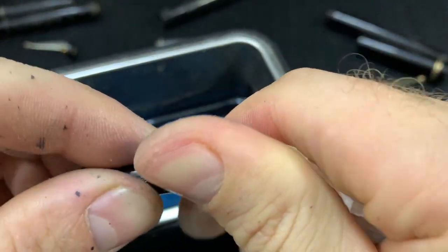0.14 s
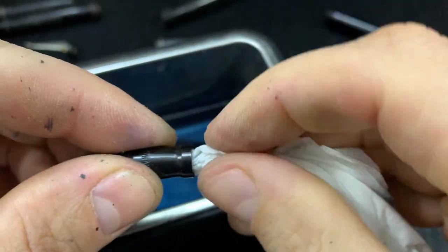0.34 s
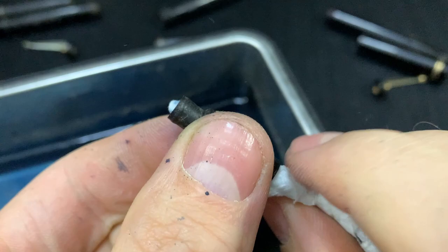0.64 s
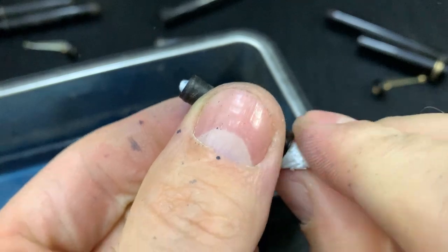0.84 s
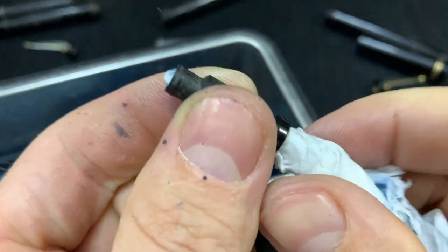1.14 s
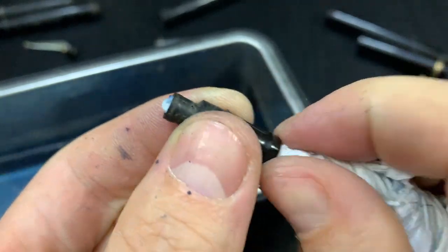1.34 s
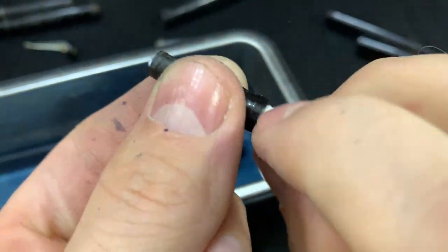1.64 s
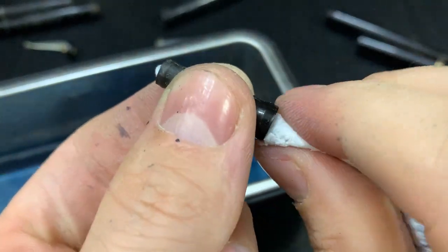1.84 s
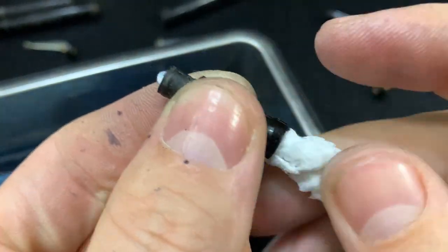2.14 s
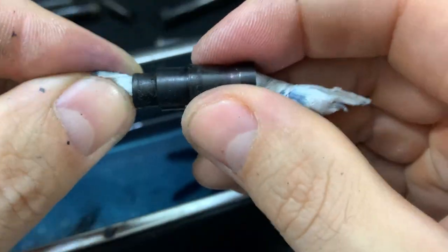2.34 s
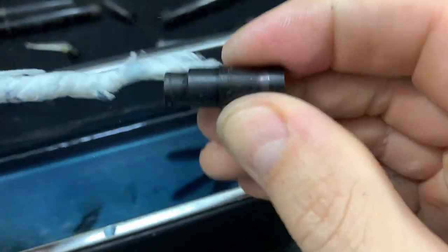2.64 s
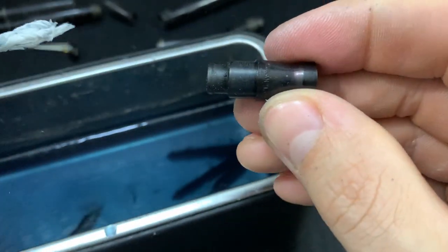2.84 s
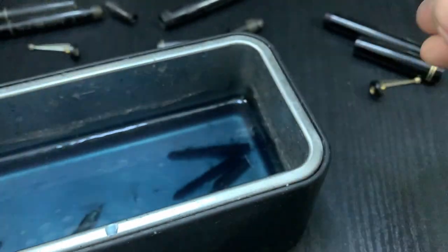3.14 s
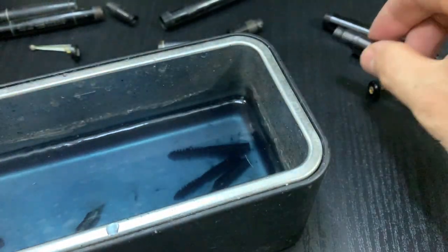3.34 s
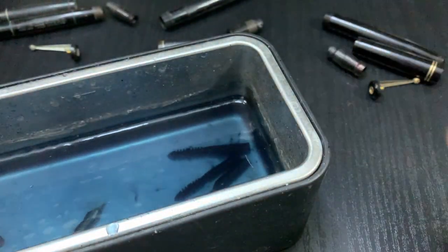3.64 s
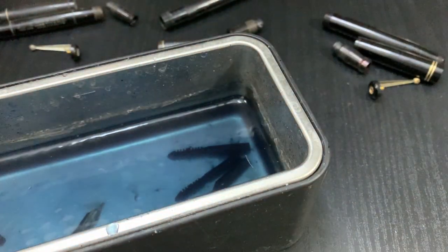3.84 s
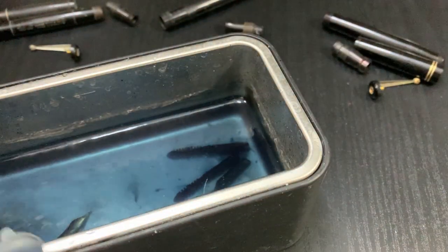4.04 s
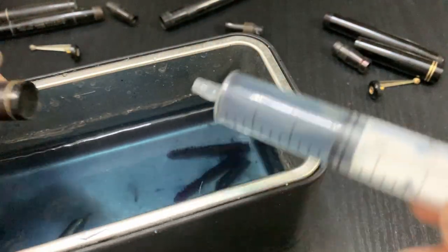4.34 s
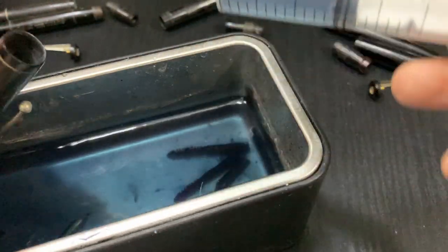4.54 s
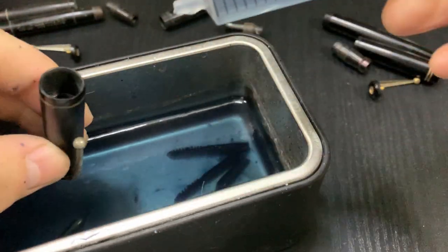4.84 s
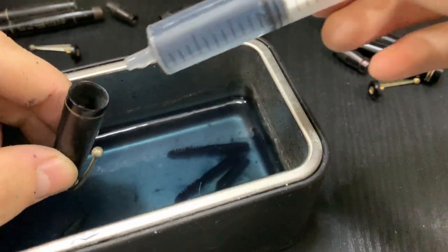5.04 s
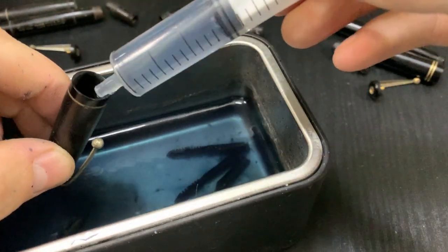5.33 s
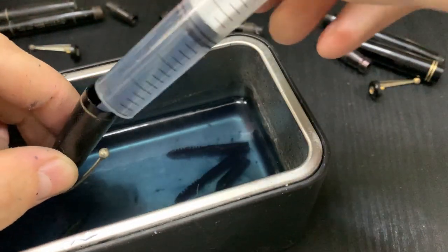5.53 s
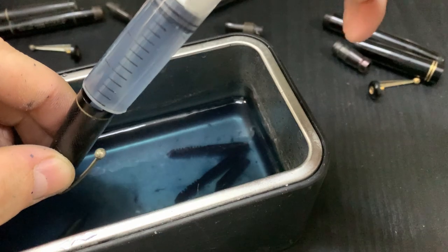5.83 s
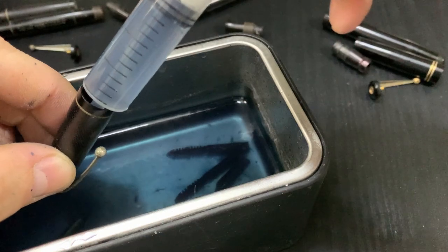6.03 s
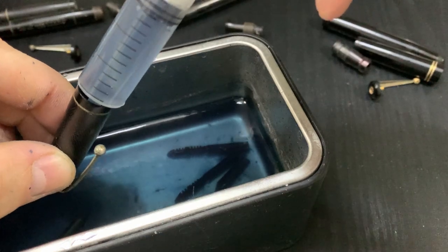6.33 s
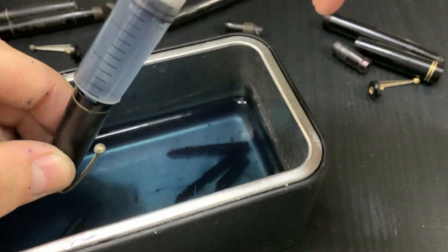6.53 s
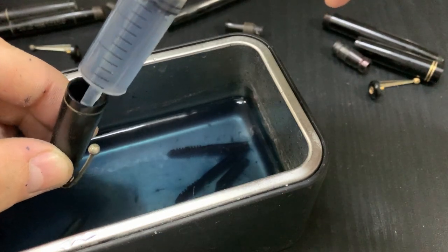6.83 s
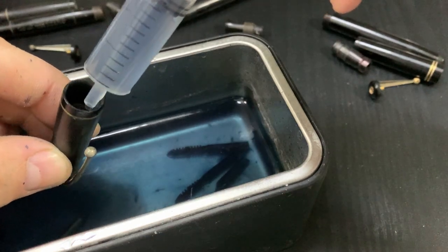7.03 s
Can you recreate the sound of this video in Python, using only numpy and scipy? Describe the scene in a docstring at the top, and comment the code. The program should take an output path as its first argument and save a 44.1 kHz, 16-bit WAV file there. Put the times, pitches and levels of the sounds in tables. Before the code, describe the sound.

Close indoor stereo sound of a small vibrating cleaning bath: a fast-pulsing, sandy treble buzz with thin whines, hiss and low hum. It starts fairly even, gains a sharper high ring after two seconds, and drops to a slower, rougher pulse around four seconds. A part lightly scuffs and taps the desk just before, and quick tool knocks land just after that change. Low desk thumps recur irregularly.

```python
"""A small cleaning tank buzzes on a desk close to a two-port microphone, in four abutting stretches.
Its drive hums in steady partials and shakes tank and soaking parts into bursts of rattle that nearly
repeat: noise through a comb, coloured by wall resonances, over whines, hiss and a low wash.
The desk passes low throbs (partials and rumble); a part is laid down and a tool knocks on the desk
(scuffs of noise, decaying modes). Hands over the tank make bright bands drift."""
import sys
import numpy as np
from scipy import signal
from scipy.fft import rfft, irfft, next_fast_len
from scipy.io import wavfile
from scipy.ndimage import uniform_filter1d, map_coordinates

SR = 44100
rng = np.random.default_rng(int(sys.argv[2]) if len(sys.argv) > 2 else 0)


def int16_out(signal):
    """Quantize to a 16-bit WAV file."""
    q = np.round(np.clip(np.atleast_2d(signal).T, -1, 1) * 32767)
    wavfile.write(sys.argv[1], SR, q.astype(np.int16))


N = 316638


def gain_of(db):
    """Amplitude factor of a level in dB."""
    return 10 ** (np.asarray(db) / 20)


def evened(x):
    """Scales to rms 1."""
    return x / np.sqrt(np.mean(x ** 2) + 1e-20)


def read(points, hz):
    """Reads a curve along log frequency."""
    point_hz, value = np.transpose(points)
    return np.interp(np.log(hz + 1), np.log(point_hz + 1), value)


def drift(n, rate_hz, count):
    """Slow chance: straight lines between random knots of rms 1, one row each."""
    knots = rng.standard_normal((count, 200))
    place = np.broadcast_arrays(np.arange(count)[:, None], np.arange(n) * rate_hz / SR)
    return map_coordinates(knots, place, order=1)


# Phase between the ports, one table a stretch. Each row: frequency in Hz, radians by which left leads.
LEAD_A = [(0, 0), (600, 4.5), (860, 7.5), (1460, 10.5), (3620, 26), (7490, 32.5), (8870, 24.5), (9220, 25),
          (9650, 28.5), (11100, 10.5), (12100, 20), (12600, 17), (13000, 18.5), (15700, 15)]
LEAD_B = [(0, -2.5), (600, -2.2), (860, -2), (2840, -1.1), (5600, -2), (7750, -12), (8870, -11), (9130, -4),
          (9990, -19), (10400, -21.5), (10700, -15.5), (11700, -21.5), (12100, -22), (15700, -13.5)]
LEAD_C = [(0, -8), (340, 1.07), (1030, 0.98), (1290, 1.45), (2240, 4.5), (2500, 3.5), (3270, -4),
          (3620, -4), (4390, -5), (5770, -7), (7320, -10), (8440, -11), (12200, -17), (15700, -20)]
LEADS = [LEAD_A, LEAD_A, LEAD_B, LEAD_C]
# Balance of the ports. Each row: frequency in Hz, left over right in dB.
BALANCE_DB = [(60, 2.5), (110, -2), (200, 2.5), (380, -1.5), (700, 5), (1290, -1.5), (2380, 0.5),
              (4400, -6), (8120, 0.5), (15000, 0.0)]
# Likeness of the ports. Each row: frequency in Hz, likeness 0-1.
PORT_LIKENESS = [(60, .5), (250, .6), (500, .7), (2000, .5), (4000, .55), (7000, .6), (10500, .85),
                 (11500, .7), (13000, .5)]


def lead_rad(k, hz):
    """Radians by which left leads in stretch k."""
    return np.interp(hz, *np.transpose(LEADS[k]))


def ports(pair, colour, k):
    """Colours two unrelated signals and mixes them into a partly alike left and right, rms 1."""
    n = pair.shape[1]
    size = next_fast_len(n)
    hz = np.fft.rfftfreq(size, 1 / SR)
    a, b = rfft(pair, size) * colour(hz)
    same = np.clip(read(PORT_LIKENESS, hz), 0, 1)
    tilt = gain_of(read(BALANCE_DB, hz) / 2)
    right = (same * a + np.sqrt(1 - same ** 2) * b) * np.exp(-1j * lead_rad(k, hz))
    return evened(irfft(np.array([a * tilt, right / tilt]), size)[:, :n])


def partials(turns, multiple, level_db, pan_db, start_turns, lag_rad):
    """Multiples of the drive at an rms level over both ports, each placed by balance and lag."""
    phase = (2 * np.pi * ((multiple * turns + start_turns) % 1)).astype(np.float32)
    level = gain_of(level_db.astype(np.float32)) * np.sqrt(2 / np.cosh(pan_db * np.log(10) / 20))
    left = level * gain_of(pan_db / 2) * np.cos(phase)
    right = level / gain_of(pan_db / 2) * np.cos(phase - lag_rad.astype(np.float32))
    return np.array([left.sum(0), right.sum(0)])


def echoing_noise(n, period_hz, likeness):
    """Noise that partly repeats every period, less so at the very top: a feedback comb."""
    size = next_fast_len(n)
    hz = np.fft.rfftfreq(size, 1 / SR)
    kept = likeness * np.interp(hz, [10600, 11600], [1, .75])
    comb = np.sqrt(1 - kept ** 2) / (1 - kept * np.exp(-2j * np.pi * hz / period_hz))
    return evened(irfft(rfft(rng.standard_normal((2, size))) * comb, size)[:, :n])


def burst_db(phase, start, rise, hold, fall, depth_db):
    """Rise, hold and fall of one burst, in dB over its quiet part."""
    u = (phase - start) % 1
    return depth_db * np.clip(np.minimum(u / rise, 1 - (u - rise - hold) / fall), 0, 1)


# Burst shapes for treble, ring and middle. Each row: start, rise, hold, fall in shares of the burst
# period, depth in dB.
BURST_A = [(.02, 0.32, 0.12, .36, 15.5), (.1, 0.35, .15, .3, 6), (.92, .36, 0.23, .42, 2)]
BURST_B = [(.03, 0.34, 0.29, 0.58, 24), (.03, 0.25, 0.14, 0.36, 17), (.05, .36, .1, .33, 6)]
BURST_C = [(0.18, 0.062, 0.2, 0.71, 29), (0.11, .16, 0.37, 0.72, 24.4), (0.19, 0.12, 0.22, 0.35, 8.64)]
BURSTS = [BURST_A, BURST_A, BURST_B, BURST_C]
# Sharp treble crack in each burst. Each entry: lift in dB, by stretch.
CRACK_DB = [3, -7, 1, 19]
CRACK_AT, CRACK_WIDTH = 0.557, 0.038  # shares of the burst period
# Weight of the burst-to-burst chance. Each entry: factor for treble, ring, middle.
SPREAD_SHARE = [0.82, 0.53, 0.99]


def burst_levels(k, bursts, spread_db):
    """Level of treble, ring and middle over the bursts, each rms 1, with one chance draw a burst."""
    number = (bursts - np.floor(bursts[0])).astype(int)
    chance = rng.standard_normal((3, 400))[:, number]
    shapes_db = [burst_db(bursts, *row) for row in BURSTS[k]]
    shapes_db[0] = shapes_db[0] + CRACK_DB[k] * np.exp(-((bursts % 1 - CRACK_AT) / CRACK_WIDTH) ** 2)
    levels = []
    for j, shape_db in enumerate(shapes_db):
        mixed = 0.42 * chance[0] + 0.62 * chance[1 + j % 2]  # common chance, plus a second draw shared by treble and middle, the ring having its own
        levels.append(evened(gain_of(shape_db + SPREAD_SHARE[j] * spread_db * mixed)))
    return levels


# Rattle colour, one table a stretch. Each row: frequency in Hz, density in dB per Hz before tank lift.
RATTLE_A = [(1180, -62), (2000, -8), (2340, -10.5), (2660, -31.5), (3360, -23.5), (4790, -19), (5650, -8),
            (6320, -14.5), (8260, -4.5), (8620, -2), (9900, 0.5), (12100, -4), (15800, -5)]
RATTLE_B = [(1180, -65), (2000, -17.5), (2500, -25.5), (2950, -22.5), (3990, -24), (4320, -19.5),
            (4960, -23), (7770, -11), (8400, -15), (9730, -6), (10800, 0), (12800, -4.5), (15800, -6)]
RATTLE_C = [(1180, -29.5), (2000, -19), (2460, -21.5), (2950, -16.5), (3990, -20.5), (4360, -21.5),
            (7190, -10), (7710, -7), (10600, 0.5), (11300, 6.5), (11900, 1), (14100, -1), (15800, -4.5)]
RATTLES = [RATTLE_A, RATTLE_A, RATTLE_B, RATTLE_C]
# Tank wall resonances. Each row: centre in Hz, width in Hz, lift in dB in the first two stretches,
# in the third, in the fourth.
TANK = [(2930, 500, 20.5, 5.5, 3), (3360, 340, 11.5, 7.8, 4.8), (4340, 370, 11.5, 6.7, 9.6),
        (5950, 150, 4, 4.1, 0.39), (7826, 216, 7.5, 5.3, 8.7), (8770, 650, 5.5, 11.4, 5.2),
        (9660, 240, 10, 1, 0.56), (10360, 680, 6.5, 8.4, 10.8), (10660, 310, 2.5, 1, 1),
        (11640, 300, 15.5, 7.2, 1.9), (12300, 190, 10.5, 1, 0.75), (14260, 330, 5.5, 1.6, 1.5),
        (14400, 430, 4, 2, 1.2)]


def wall(k, hz):
    """Gain of the shaken wall: rattle colour lifted at the resonances."""
    lift_db = sum(row[1 + max(k, 1)] / (1 + (2 * (hz - row[0]) / row[1]) ** 2) for row in TANK)
    return gain_of(read(RATTLES[k], hz) + lift_db)


def treble_share(hz):
    """Share of power in the treble rattle, the rest going to the middle; they cross at 5500 Hz."""
    return 1 / (1 + (5500 / (hz + 1)) ** 8)


def treble_rattle(k, shake, crack):
    """Upper rattle of the wall, pulsing with the bursts."""
    return ports(shake * crack, lambda hz: wall(k, hz) * np.sqrt(treble_share(hz)), k)


# Steady hiss that fills between bursts. Each entry: dB against the treble rattle, by stretch.
HISS_DB = [-17, -13, -15, -11.5]
HISS_FROM_HZ = 11800


def hiss(k, n):
    """High wall noise that does not pulse with the bursts."""
    def colour(hz):
        return wall(k, hz) / np.sqrt(1 + (HISS_FROM_HZ / (hz + 1)) ** 20)
    return gain_of(HISS_DB[k]) * ports(rng.standard_normal((2, n)), colour, k)


def middle_rattle(k, shake, thrum):
    """Lower rattle of the wall, pulsing with the bursts."""
    return ports(shake * thrum, lambda hz: wall(k, hz) * np.sqrt(1 - treble_share(hz)), k)


RING_HZ = 10960
# Wall ring. Each entry: resonance width in Hz, by stretch.
RING_WIDTH_HZ = [300, 300, 223, 390]


def wall_ring(k, shake, swell):
    """The bursts' noise through one doubled wall resonance."""
    return ports(shake * swell, lambda hz: 1 / (1 + 2j * (hz - RING_HZ) / RING_WIDTH_HZ[k]) ** 2, k)


# High partials, one table a stretch. Each row: multiple of the drive, nominal level in dB,
# left over right in dB.
WHINE_A = [(360, -70, 0), (424, -61, 0), (462, -65, 0), (468, -63, 0), (500, -66, 0), (568, -65, 0)]
WHINE_B = [(138, -66, 0), (159, -69, 0), (208, -64, 3), (376, -68, -1), (422, -63, -1), (498, -58, 0),
           (522, -49, 0)]
WHINE_C = [(73, -61, 1), (80, -66, -3), (104, -58, -6), (187, -62, 1), (204, -63, 1), (246, -59, 0),
           (261, -53, 0)]
WHINES = [WHINE_A, WHINE_A, WHINE_B, WHINE_C]


def whine(k, turns, drive_hz, swell, ring_db):
    """High drive partials that swell with each burst, wandering in level and phase."""
    n = len(turns)
    multiple, db, pan_db = np.transpose(WHINES[k])[:, :, None]
    hz = multiple * drive_hz
    start_turns = rng.random(multiple.shape) + 0.1 * drift(n, 14, count=len(multiple))
    db = db - .5 + 3 * drift(n, 11.6, count=len(multiple))
    # near the ring they share its level
    db = db + (ring_db - ring_db.mean()) / (1 + ((hz - RING_HZ) / 900) ** 2)
    return swell * partials(turns, multiple, db, pan_db, start_turns, lead_rad(k, hz))


# Hum partials, one table a stretch. Each row: multiple of the drive, level in dB rms at a quarter and
# at three quarters of the stretch, left over right in dB, lag of right in radians early, late.
HUM_A = [(18, -67, -77, -2, 1.0, 3.4), (23, -68, -67, -2, 0.9, 3.6), (26, -58, -58, 1, 0.8, 3.4),
         (30, -65, -67, 17, 1.3, 7.0), (33, -70, -70, 15, -1.3, 1.8), (36, -56, -55, 20, -2.1, 0.4),
         (37, -70, -68, -2, 1.0, 0.3), (40, -56, -56, 1, 0.9, 0.2), (46, -59, -58, 7, 1.3, 3.1),
         (49, -64, -63, 4, 2.0, 1.2), (52, -58, -57, 4, 1.8, 1.5), (56, -56, -56, 0, 2.1, 2.1),
         (59, -69, -69, 1, 2.1, 2.2), (61, -65, -63, 18, -0.9, -0.6), (64, -60, -58, 20, -0.1, -0.0),
         (68, -56, -56, -1, -3.1, -2.2), (71, -68, -66, -5, -2.8, -1.3), (78, -64, -69, -12, -0.5, 3.9),
         (84, -66, -66, 11, 2.1, 3.2), (108, -66, -67, 17, 0.0, 0.5)]
HUM_B = [(23, -66, -67, -1, -1.2, .2), (26, -59, -59, 0, -1.3, -.8), (36, -55, -56, 12, .4, 2.7),
         (40, -56, -59, 2, 1.1, 2.8), (43, -70, -69, 5, -1.1, -2.3), (46, -54, -58, 11, -1.4, -2),
         (49, -62, -63, 4, -2.8, -2.4), (52, -56, -54, 5, 3.1, 5.2), (55, -61, -63, 5, -2.1, -.8),
         (58, -66, -69, 0, -1.2, -1.8), (64, -70, -68, -5, -1.8, -3.7), (66, -72, -62, 5, -1.1, -1),
         (68, -57, -57, -8, 2.2, 1.8), (71, -68, -67, -9, 2.7, 2.9), (78, -74, -62, -12, -.2, -1.9),
         (96, -72, -66, -13, -2.8, -1.6), (110, -64, -65, 20, 1, -.5)]
HUM_C = [(9, -69, -66, -2, -0.6, 1.8), (10, -70, -68, -1, 0.9, 1.6), (11, -71, -69, 1, 0.4, 1.3),
         (12, -62, -60, 1, -0.0, 0.9), (13, -57, -55, -1, 0.2, 0.8), (14, -64, -63, 1, 0.9, 1.4),
         (15, -63, -63, 3, 0.8, 1.3), (16, -62, -63, 6, 1.3, 1.0), (17, -64, -66, 5, 1.8, 1.7),
         (18, -53, -52, 5, 1.5, 1.1), (19, -59, -58, 4, 0.9, 0.6), (20, -54, -49, -1, 1.3, 1.4),
         (22, -69, -66, 0, 1.9, 2.0), (23, -56, -53, 9, 2.4, 1.5), (24, -58, -56, 2, 2.6, 2.3),
         (25, -55, -53, 10, 2.4, 2.3), (26, -54, -57, 8, 2.0, 0.7), (27, -59, -61, 7, 2.5, 1.3),
         (28, -63, -64, 8, 2.9, 2.3), (29, -65, -62, 1, -0.2, -0.1), (30, -64, -59, -5, -0.3, 0.9),
         (31, -71, -66, -6, -2.2, -4.8), (32, -63, -68, 3, -2.4, -0.7), (33, -63, -72, 2, -2.9, -1.2),
         (34, -61, -64, 1, -2.0, -5.1), (35, -65, -62, 0, 2.2, 3.2), (36, -67, -67, 4, -0.2, -1.1),
         (39, -68, -66, -7, -3.1, -4.4), (40, -67, -65, 5, 2.5, 0.9), (41, -72, -67, -5, -0.5, 1.0),
         (43, -73, -70, 2, 1.9, 2.8), (48, -67, -66, -2, -2.8, -3.2), (49, -72, -70, -4, 3.1, 5.1),
         (51, -67, -66, 0, 2.7, 3.4), (53, -70, -70, 2, -3.0, -2.2)]
HUMS = [HUM_A, HUM_A, HUM_B, HUM_C]
# Time over which the hum's lag shifts. Each entry: share of the stretch length, by stretch.
TURN_SHARE = [8, 0.11, 0.14, 0.48]


def hum(k, turns, drive_hz):
    """Steady drive partials; the lag between the ports shifts over the stretch."""
    n = len(turns)
    multiple, early_db, late_db, pan_db, early_lag, late_lag = np.transpose(HUMS[k])[:, :, None]
    along = np.linspace(0, 1, n)
    db = early_db + (late_db - early_db) * np.clip(2 * along - .5, -.3, 1.3)
    db = db + 1.2 * drift(n, 5, count=len(multiple))
    lag_rad = early_lag + (late_lag - early_lag) * np.clip((along - .14) / TURN_SHARE[k], 0, 1)
    # turns by which upper partials lead the burst
    early_turns = np.clip((multiple * drive_hz - 700) / 2000, 0, .22)
    start_turns = np.cumsum(early_turns * np.diff(multiple, prepend=0, axis=0), axis=0)
    start_turns = start_turns + 0.24 * rng.standard_normal(multiple.shape)
    return partials(turns, multiple, db, pan_db, start_turns, lag_rad)


# Wash colour. Each row: frequency in Hz, density in dB per Hz.
WASH = [(25, -16), (60, -15), (150, -10.5), (290, -9.5), (420, -2.5), (800, 0), (1300, 2.5), (1900, -8),
        (2600, -11.5), (4000, -16.5)]


def low_wash(k, thrum):
    """Low noise that pulses with the middle rattle but never repeats."""
    noise = rng.standard_normal((2, len(thrum)))
    return ports(noise * thrum, lambda hz: gain_of(read(WASH, hz)), k)


# Stretches. Each row: start in s, drive in Hz, time of one mid burst period in s, comb feedback 0-1,
# nominal burst-to-burst spread in dB.
STRETCHES = [(0, 20.913, .2069, .85, 1), (.413, 20.913, .9969, .85, 1), (2.28, 20.967, 3.0013, .85, 1.3),
             (3.947, 41.953, 4.245, .88, .9)]
# Burst rate. Each entry: bursts per drive turn, by stretch.
BURSTS_PER_TURN = [3, 3, 3, 1]
# Upper levels, one curve a stretch. Each row: time in s, treble rattle in dB, wall ring in dB.
TREBLE = [
    [(.1, -44.5, -56), (.31, -44, -58)],
    [(.5, -44, -72), (.75, -41, -75), (1.11, -44, -85), (1.42, -43.5, -62), (1.58, -42.5, -63),
     (1.76, -46, -66), (2.1, -42, -72)],
    [(2.3, -50, -51), (2.4, -44.5, -41.5), (2.57, -38, -42), (2.61, -41.5, -49), (3.05, -43, -49),
     (3.09, -43, -36), (3.13, -42, -46), (3.17, -41, -36), (3.59, -43, -36.5), (3.63, -41, -40.5)],
    [(4.03, -40, -38), (4.18, -40, -39.5), (4.64, -39.5, -42), (4.87, -39, -34.5), (5.1, -41.5, -37.5),
     (5.5, -40.5, -35.5), (6.03, -41.5, -40), (6.18, -39.5, -42), (6.9, -41, -37.5), (7.1, -42.5, -44)],
]
# Lower levels, one row a stretch. Each row: middle rattle in dB at start, at end, low wash in dB
# at start, at end.
BODY = [(-51, -51.5, -52.5, -51.5), (-53.5, -54, -53, -54.5), (-49, -48.5, -51, -50.5),
        (-45.5, -44, -53, -52.5)]


def buzz(k, t):
    """One stretch: rattle, ring, whine and wash pulse with the bursts, hum and hiss run on."""
    _, drive_hz, peak_s, likeness, spread_db = STRETCHES[k]
    n = len(t)
    level_s, *columns = np.transpose(TREBLE[k])
    treble_db, ring_db = (np.interp(t, level_s, c) for c in columns)
    body_db = np.linspace(BODY[k][::2], BODY[k][1::2], n).T
    middle_db, wash_db = body_db + 0.25 * drift(n, 6.24, count=2)
    turns = (t - peak_s) * drive_hz
    crack, swell, thrum = burst_levels(k, turns * BURSTS_PER_TURN[k] + .5, spread_db)
    repeating = echoing_noise(n, drive_hz * BURSTS_PER_TURN[k], likeness)
    shake = 0.73 * repeating + 0.67 * rng.standard_normal((2, n))
    out = gain_of(treble_db) * (treble_rattle(k, shake, crack) + hiss(k, n))
    out += gain_of(middle_db) * middle_rattle(k, shake, thrum)
    out += gain_of(ring_db) * wall_ring(k, shake, swell)
    out += whine(k, turns, drive_hz, swell, ring_db)
    out += hum(k, turns, drive_hz)
    return out + gain_of(wash_db) * low_wash(k, thrum)


# Depth of the bright-band drift. Each row: time in s, depth in dB.
DRIFT_DB = [(0, 2.4), (3.9, 2.3), (4.0, 1.37)]
DRIFT_HZ, DRIFT_S, DRIFT_FROM_HZ = 350, .3, 2380  # band width, band length, lower edge
DRIFT_APART = .45  # weight of the part opposite at the two ports


def moving_hands(x):
    """Hands over the tank shade and reflect the treble: bright bands drift, differently at each port."""
    hz, t, z = signal.stft(x, SR, nperseg=512)
    patches = rng.standard_normal(z.shape)
    for _ in range(2):
        patches = uniform_filter1d(patches, max(round(DRIFT_HZ / hz[1]), 1), 1)
        patches = uniform_filter1d(patches, max(round(DRIFT_S / t[1] / 2), 1), 2)
    patches = patches[0] + DRIFT_APART * patches[1] * np.array([1, -1])[:, None, None]
    depth_db = np.interp(t, *np.transpose(DRIFT_DB))
    gain = gain_of(depth_db * evened(patches) * np.clip(hz / DRIFT_FROM_HZ - 1, 0, 1)[:, None])
    gain = gain / np.sqrt((gain ** 2).mean((0, 2), keepdims=True))  # mean power 1 in each bin
    return signal.istft(z * gain, SR, nperseg=512)[1][:, :N]


# Low drive partials in the desk. Each row: frequency in Hz, relative level in dB.
THROB_PARTIALS = [(41.95, -1.5), (83.9, 5.5), (125.9, -5), (167.8, -5), (209.8, -7), (251.7, -8.5)]
# Throbs through the desk. Each row: start in s, hold in s, nominal level in dB (raised when the ports
# are out of step), radians by which left leads.
THROBS = [(0, .03, -66, 0.5), (.34, 0.022, -75, 0), (0.615, 0.13, -63.5, 0.5), (0.772, .08, -68, 2.5),
          (1.198, 0.012, -66, 4.5), (1.55, 0.063, -73, 4), (2.031, 0.034, -61, 5), (2.203, .01, -68, 4.5),
          (2.276, .025, -64, 5), (2.372, 0.012, -60, 2.6), (2.527, 0.046, -61, 4.5), (2.673, .02, -61, 3.5),
          (2.752, .17, -70, 3.9), (2.947, 0.045, -59.5, 3.9), (3.027, 0.43, -63, 3.9),
          (3.17, .025, -67, 5.5), (3.455, .08, -66, 4.5), (3.664, 0.063, -54, 0.5),
          (3.78, 0.16, -62.5, 3.9), (4.0, .03, -56.5, -1.5), (4.17, .015, -48.5, 0),
          (4.29, .025, -58, -0.5), (4.415, .01, -54, 0), (4.493, 0.0093, -48.5, 0), (4.644, .01, -47.5, 0),
          (4.754, 0.015, -52, 0), (4.878, 0.065, -53.5, 0), (5.015, 0.0085, -56, 0),
          (5.08, 0.34, -62, -0.5), (5.453, .13, -57, -1), (5.621, 0.037, -48.5, 0.5),
          (5.707, 0.32, -59.5, 0), (6.26, 0.2, -62, 0), (6.71, 0.22, -62, -0.5), (6.905, .3, -57, 0)]
THROB_RISE_DB_PER_S, THROB_FALL_DB_PER_S, THROB_FLOOR_DB = 550, 380, -89.5


def throb():
    """The desk carries low drive partials and rumble in short throbs; ports at times out of step."""
    t = np.arange(N) / SR
    lines = sum(gain_of(db) * np.sin(2 * np.pi * (hz * t + rng.random())) for hz, db in THROB_PARTIALS)
    band = signal.butter(3, [33, 140], "bandpass", fs=SR, output="sos")
    rumble = signal.sosfilt(band, rng.standard_normal(N))
    low = signal.hilbert(0.76 * evened(lines) + 0.54 * evened(rumble), next_fast_len(N))[:N]
    step = t[::64]
    start, hold, db, lead = np.transpose(THROBS)[:, :, None]
    rise_db = THROB_RISE_DB_PER_S * np.maximum(start - step, 0)
    fall_db = THROB_FALL_DB_PER_S * np.maximum(step - start - hold, 0)
    level = gain_of(db - rise_db - fall_db) / np.sqrt(0.3 + 0.7 * np.cos(lead / 2) ** 2)
    floor = gain_of(THROB_FLOOR_DB)
    left = np.interp(t, step, floor + level.sum(0))
    right = np.interp(t, step, floor + (level * np.exp(-1j * lead)).sum(0))
    return np.array([(low * left).real, (low * right).real])


# A part or tool scraping the desk. Each row: centre in s, peak level in dB rms, length in s.
SCUFFS = [(3.562, -37.5, 0.01), (3.595, -46.5, 0.014), (4.108, -41, 0.0036)]


def scuffs():
    """Short broad puffs of band-passed noise, partly shared by the ports."""
    band = signal.butter(1, [150, 5000], "bandpass", fs=SR, output="sos")
    grit = signal.sosfilt(band, rng.standard_normal((2, N)))
    grit = evened(grit + 0.24 * grit[::-1])
    t = np.arange(N) / SR
    return grit * sum(gain_of(db) * np.exp(-((t - s) / length_s) ** 2) for s, db, length_s in SCUFFS)


# Knocks on the desk. Each row: start in s, peak in dB midway between the ports.
KNOCKS = [(3.566, -40), (3.596, -42), (4.014, -33), (4.054, -36.5), (4.107, -23.5), (4.15, -28.5)]
# Desk modes. Each row: frequency in Hz, relative level in dB for a -25 dB knock, 60 dB decay in s.
DESK = [(386, -3, 0.13), (544, 1.5, 0.057), (670, 10, 0.023), (760, 7.5, 0.059), (1187, -7.5, 0.12),
        (1400, -6, 0.058), (2106, -8, 0.038), (3000, -13, 0.025), (3800, -15, 0.069)]


def knocks():
    """Knocks ring the decaying desk modes; softer ones are duller."""
    out, t = np.zeros((2, N)), np.arange(6000) / SR
    for s, db in KNOCKS:
        ring = np.zeros(len(t))
        for hz, mode_db, t60_s in DESK:
            level_db = mode_db + .4 * (db + 25.0) * hz / 1000 - 60 * t / t60_s
            ring += gain_of(level_db) * np.sin(2 * np.pi * hz * t)
        ring *= np.minimum(t / 0.002, 1)
        at = round(s * SR)
        port_db = db + np.array([[1.8], [-1.8]])
        out[:, at:at + len(t)] += gain_of(port_db) * ring / abs(ring).max()
    return out


def scene():
    """The stretches end to end under moving hands, plus the desk's throbs, scuffs and knocks."""
    edges = [round(row[0] * SR) for row in STRETCHES] + [N]
    parts = [buzz(k, np.arange(edges[k], edges[k + 1]) / SR) for k in range(len(STRETCHES))]
    return moving_hands(np.concatenate(parts, axis=1)) + throb() + scuffs() + knocks()


EDGE_HZ = 15790


def record(dry):
    """The band limit: a steep low-pass."""
    lowpass = signal.firwin(1023, EDGE_HZ, window=("kaiser", 9), fs=SR)
    return signal.oaconvolve(dry, lowpass[None], "same")


dry = scene()
out = record(dry)
int16_out(out)
```